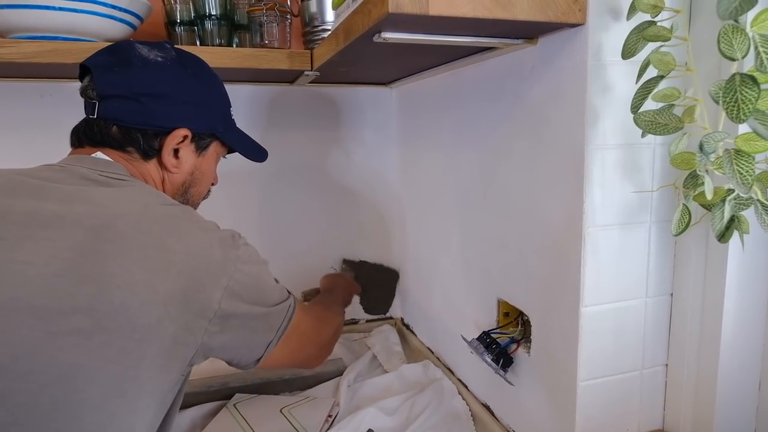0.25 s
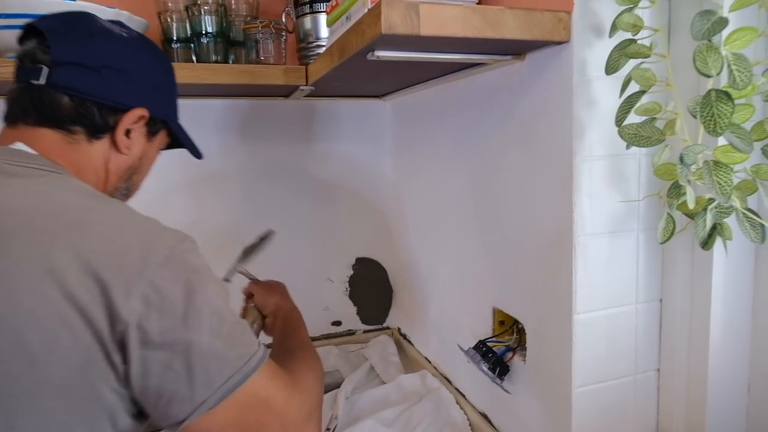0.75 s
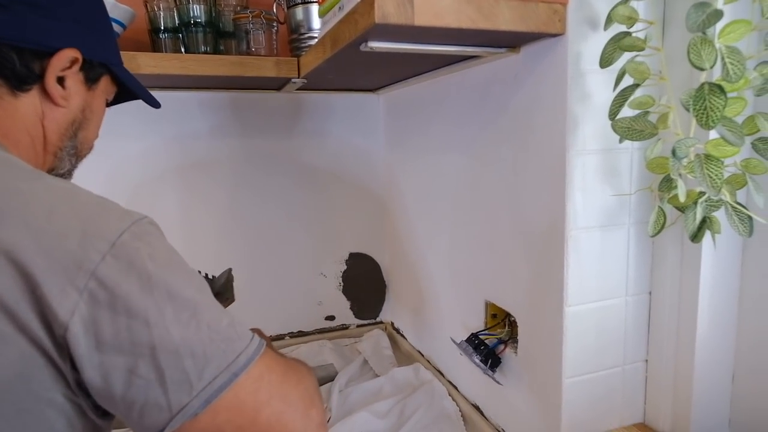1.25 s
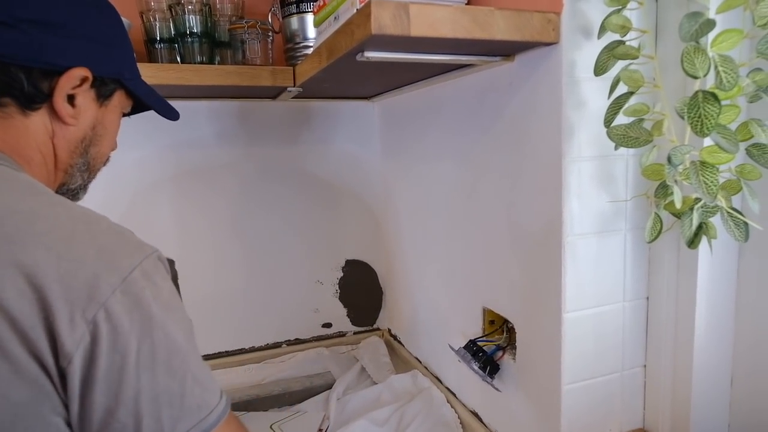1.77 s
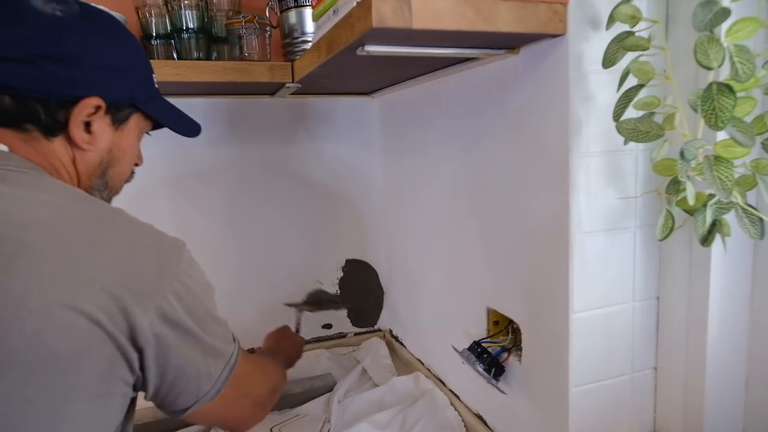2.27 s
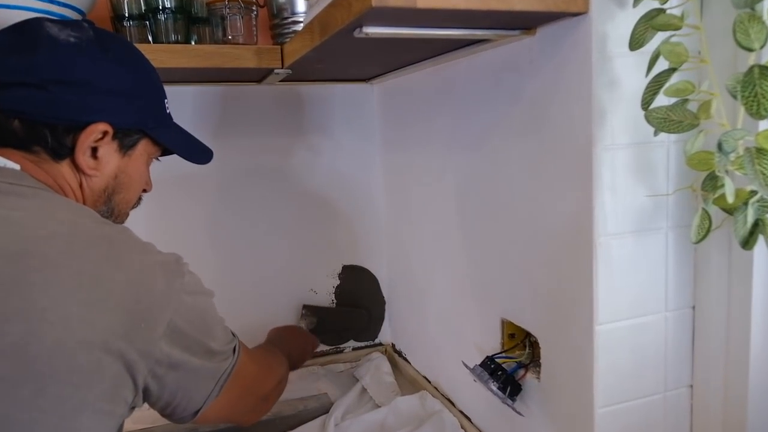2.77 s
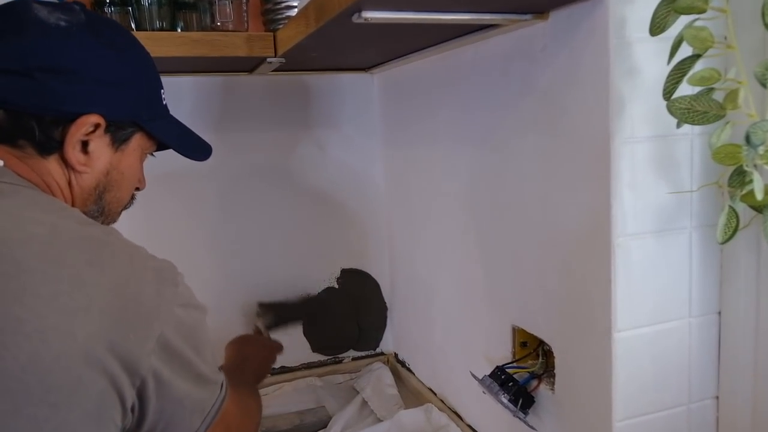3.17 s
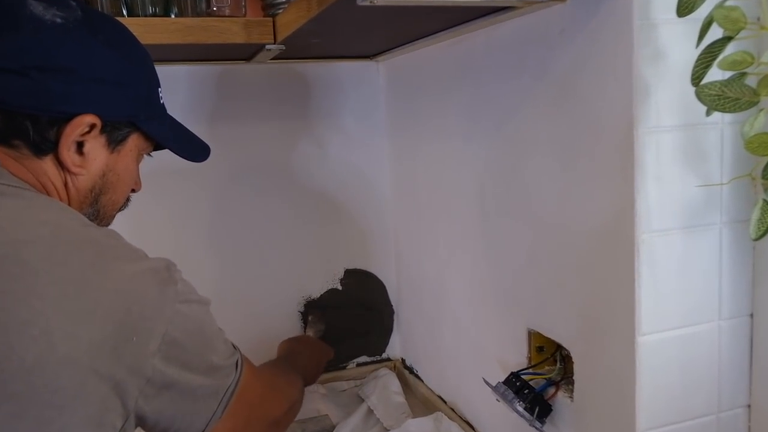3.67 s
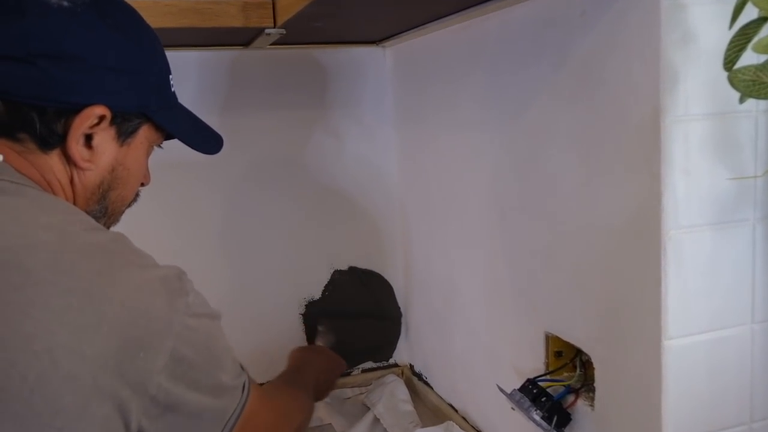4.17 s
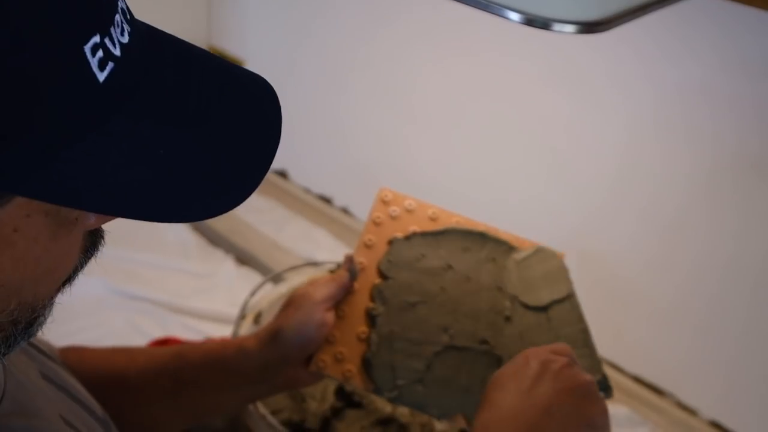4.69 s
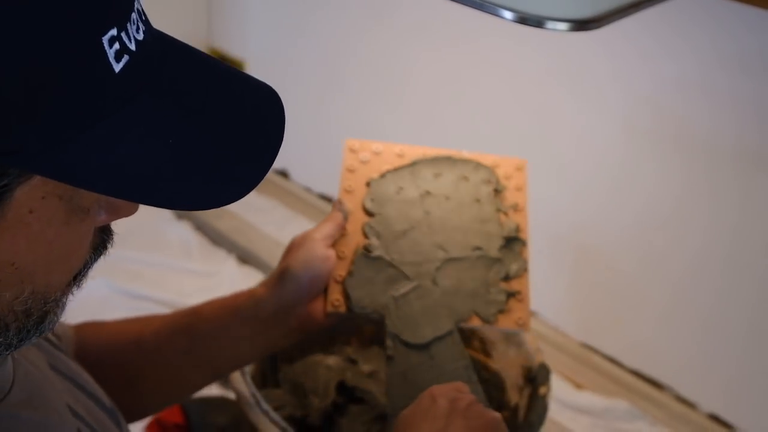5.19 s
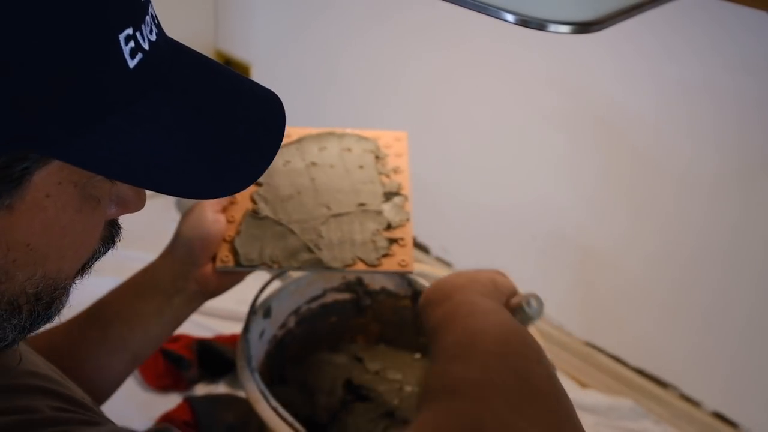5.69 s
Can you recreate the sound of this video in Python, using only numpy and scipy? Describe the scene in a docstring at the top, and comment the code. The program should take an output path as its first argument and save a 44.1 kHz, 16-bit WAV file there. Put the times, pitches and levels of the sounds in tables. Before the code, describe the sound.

A small steel trowel works sandy wet adhesive in a bare kitchen. A gritty wipe on the wall comes first, then a wet slap and a longer rising scoop from a bucket. After a quiet gap come brief hollow spreading scrapes and soft pats, then rapid rasps on the back of a tile and a last pair of scrapes. Close stereo microphones catch a short bright room echo over faint air.

```python
"""Trowel and gritty tile adhesive

A steel trowel spreads adhesive on a kitchen wall, scoops more from a bucket, then butters the back of a tile.
Strokes are random sand grains and paste hiss, bunched by stick and slip, coloured by contact resonances.
Unsteady sines make hollow honks, sinking sines make wall thuds; noise bursts make taps, smacks and ticks.
Swelling filtered noise is the smear of wet paste. A bare room answers a close pair of microphones,
over faint steady air."""
import sys
import numpy as np
from scipy import signal
from scipy.fft import rfft, irfft, next_fast_len
from scipy.io import wavfile
from scipy.ndimage import map_coordinates

SR = 44100
rng = np.random.default_rng(int(sys.argv[2]) if len(sys.argv) > 2 else 0)


def file_out(sig):
    """Save sig as 16-bit WAV at sys.argv[1]."""
    # one column per channel
    cols = np.atleast_2d(sig).T
    # limit, then scale
    lim = np.clip(cols, -1, 1)
    pcm = np.round(lim * 32767).astype(np.int16)
    wavfile.write(sys.argv[1], SR, pcm)


N = 261954
SIZE = 65536  # samples in one event
HZ, T = np.fft.rfftfreq(SIZE, 1 / SR), np.arange(SIZE) / SR


def amp(db):
    """Decibels to gain."""
    return 10 ** (np.asarray(db) / 20)


def unit(x):
    """Scaled to rms 1."""
    return x / np.sqrt(np.mean(x ** 2) + 1e-20)


def along(points, hz):
    """Interpolate (frequency [Hz], value) points on a log frequency axis."""
    f, v = np.transpose(points)
    return np.interp(np.log(hz + 1), np.log(f + 1), v)


def wobble(rate, size):
    """Smooth random curve, rate knots a second."""
    knots = rng.standard_normal(int(size * rate / SR) + 4)
    return map_coordinates(knots, [np.arange(size) * rate / SR])


def add(track, s, sound, fade_s=.3):
    """Mix a stereo sound into the track from time s, fading its far end."""
    at = round(s * SR)
    start = max(at, 0)
    faded = sound * np.minimum((T[-1] - T) / fade_s, 1)
    part = faded[:, max(-at, 0):N - at]
    track[:, start:start + part.shape[1]] += part


def body(tone, ring=()):
    """Causal minimum-phase response of unit power: a broad colour with resonant peaks on it."""
    db = along(tone, HZ)
    for hz, half_width_hz, lift_db in ring:
        db = db + lift_db / (1 + ((HZ - hz) / half_width_hz) ** 2)
    cepstrum = irfft(np.log(amp(db) + 1e-5))[:SIZE // 2]
    response = np.exp(rfft(2 * cepstrum, SIZE))
    return response / np.sqrt(np.mean(np.abs(response) ** 2))


# left-right likeness: (frequency [Hz], likeness [0-1])
ALIKE = [(60, .998), (340, .999), (520, .99), (750, .94), (1410, .68), (3100, .33), (6820, .05), (15000, 0)]
# left-right balance: (frequency [Hz], left minus right [dB])
LEAN_DB = [(600, 0), (1300, -1.2), (2400, -2.4), (4400, 0), (15000, 0)]


def ports(mid, side, hz):
    """Two close microphones: alike in the bass, unrelated in the treble."""
    turn = np.arccos(along(ALIKE, hz)) / 2
    sign = np.array([[1], [-1]])
    pair = mid * np.cos(turn) + sign * side * np.sin(turn)
    return pair * amp(sign * along(LEAN_DB, hz) / 2)


# decay of the bare room: (frequency [Hz], t60 [s])
ROOM_T60_S = [(150, 0.67), (400, 0.38), (1000, 0.57), (2500, 0.52), (5000, 0.47), (10000, 0.31),
              (16000, 0.21)]
# colour of the late sound: (frequency [Hz], level [dB])
WET_DB = [(150, 4.5), (400, -5.5), (1200, -5), (3000, -11), (6000, -8), (15000, -3)]


def room(pair, wet_db, near_db=-4.5, near_t60=0.058):
    """Direct sound, quick corner-wall cluster and long bare-room tail, from mid and side spectra."""
    def spectrum(x):
        """Spectrum of unit-energy echoes."""
        return rfft(x[:, :SIZE] / np.linalg.norm(x, axis=1, keepdims=True), SIZE)

    near_fade = amp(-60 * T / near_t60) * (1 - np.exp(-T / 0.0016))
    near = spectrum(rng.standard_normal((2, SIZE)) * near_fade)
    hz, t, z = signal.stft(rng.standard_normal((2, SR)), SR, nperseg=256)
    t60 = along(ROOM_T60_S, hz)[:, None]
    late_fade = amp(-60 * t / t60) * (1 - np.exp(-t / 0.0087)) / np.sqrt(t60)
    late = spectrum(signal.istft(z * late_fade, SR, nperseg=256)[1])
    echo = amp(near_db) * HZ / np.hypot(HZ, 1100)  # near echoes are weaker in the bass
    direct_and_near = (1 + echo * near) / np.sqrt(1 + echo ** 2)
    paths = direct_and_near + amp(wet_db + along(WET_DB, HZ)) * late
    return irfft(ports(*(pair * paths), HZ))


def burst(db, t60):
    """Mid and side spectra of a noise crunch that dies away exponentially."""
    return rfft(amp(db - 60 * T / t60) * rng.standard_normal((2, SIZE)))


def rush(tone):
    """Steady coloured stereo noise of rms 1."""
    size = next_fast_len(N + 8192)
    hz = np.fft.rfftfreq(size, 1 / SR)
    pair = ports(*rfft(rng.standard_normal((2, size))), hz)
    return unit(irfft(pair * amp(along(tone, hz)), size)[:, :N])


# relative colour of each contact: (frequency [Hz], level [dB])
WIPE_TONE_DB = [(40, -55), (100, -36.5), (200, -21.5), (350, -13), (600, -4), (1000, -2.5), (1600, 2),
                (2500, 5.5), (3600, -1.5), (5000, -7), (8000, -14.5), (12000, -19.5), (15000, -31)]
SLAP_TONE_DB = [(40, -83), (100, -17), (200, -33), (350, -20), (600, -2.5), (1000, 3.5), (1600, 0),
                (2500, -1.5), (3600, -5.5), (5000, -4.5), (8000, -14), (12000, -15), (15000, -21)]
SCOOP_TONE_DB = [(40, -60), (100, -28), (200, -16.5), (350, -6), (600, -3), (1000, -4.5), (1600, 6),
                 (2500, 1.5), (3600, -1.5), (5000, -7), (8000, -12), (12000, -17.5), (15000, -21.5)]
LIFT_TONE_DB = [(40, -55), (100, -26.5), (200, -22), (350, -14), (600, -7), (1000, -0.5), (1600, -1.5),
                (2500, 0), (3600, -1.5), (5000, -7), (8000, -11.5), (12000, -16.5), (15000, -23)]
SPREAD_TONE_DB = [(40, -57), (100, -37), (200, -18.5), (350, -7), (600, -7.5), (1000, -0.5), (1600, -5),
                  (2500, -6), (3600, -6.5), (5000, -14.5), (8000, -19.5), (12000, -21.5), (15000, -31)]
PRESS_TONE_DB = [(40, -47), (100, -25), (200, -36), (350, -1.5), (600, -4), (1000, 2), (1600, -3),
                 (2500, -2), (3600, -4.5), (5000, -9.5), (8000, -12), (12000, -16.5), (15000, -25)]
BUTTER_TONE_DB = [(40, -57), (100, -31), (200, -21.5), (350, -10.5), (600, -4), (1000, -4), (1600, -1.5),
                  (2500, 1), (3600, -2.5), (5000, -10.5), (8000, -13.5), (12000, -19.5), (15000, -29)]
CLEAN_TONE_DB = [(40, -53.5), (100, -37), (200, -28), (350, -16), (600, -12.5), (1000, -2), (1600, 1),
                 (2500, 1), (3600, -1.5), (5000, -7), (8000, -11.5), (12000, -20), (15000, -27)]
# resonances of blade and surface, before wander: (frequency [Hz], half-width [Hz], lift [dB])
WIPE_RING = [(562, 50, 7), (1352, 92, 11), (1910, 110, 6), (2550, 157, -0.5), (3130, 870, 4)]
SLAP_RING = [(393, 41, 9.1), (1270, 110, 3.5), (2400, 150, 8.3), (2800, 78, 11), (8400, 630, 9.1)]
SCOOP_RING = [(950, 80, 11), (1257, 60, 6.1), (1610, 55, 1.7), (2050, 96, 1.9)]
LIFT_RING = [(403, 11.3, 20.7), (1280, 140, 5.6), (1660, 33, 8.4), (1744, 82, 7.9)]
SPREAD_RING = [(598, 48, 7.3), (778, 15, 6.1), (1710, 54, 7.3), (1980, 35, 5.9), (2370, 110, 6.6),
               (3220, 80, 5.1)]
PRESS_RING = [(572, 67, 10.5), (870, 37, 1), (1800, 60, 5.6), (3070, 130, 3.6), (3640, 33, 2.2)]
BUTTER_RING = [(706, 35, 6.2), (1024, 54, 10.4), (1430, 17, 3.5), (1650, 120, 4.8), (2330, 160, 6.6)]
CLEAN_RING = [(403, 41, 8.4), (731, 28, 9.5), (1110, 38, 3.1), (1866, 110, 7), (3220, 300, 2.9),
              (5400, 80, 4.2)]
# pulls of the blade: (time [s], length [s], level [dB], swell over the pull [dB],
# bite on landing, negative eases in [dB], roll from edge to flat [dB], contact [name])
PULLS = [(-.09, 0.039, -29.5, -11, -4, 18, "wipe"), (.4665, 0.11, -21.5, 5.5, -3.5, 16, "wipe"),
         (1.1937, 0.041, -24.5, -4.5, 18, 7.5, "slap"), (1.279, .275, -25.5, 11, 2.5, 0.5, "scoop"),
         (1.565, 0.2, -21.5, 0.5, 1.5, 3.5, "lift"), (3.0471, .076, -26.5, -11, 4.5, 3, "spread"),
         (3.8792, .075, -24.5, -14, 4, 4.5, "press"), (4.603, 0.043, -23.5, 0, 0.5, 8.5, "butter"),
         (4.661, 0.034, -22, -6, 4.5, 3, "butter"), (4.721, 0.035, -22.5, -2.5, -5, 9, "butter"),
         (4.7722, .007, -21.5, -10, 3, -1, "butter"), (5.168, 0.024, -20.5, -10, -5.5, 6, "clean"),
         (5.201, .102, -23, 0, 5.5, 6.5, "clean")]


def strokes():
    """Wall, bucket, wall again, then tile back: each contact has its own colour and place in the room."""
    contacts = {
        "wipe": dict(tone=WIPE_TONE_DB, ring=WIPE_RING, wet_db=2, glide_oct=-0.026, pan_db=0,
                     edge_db=2.5, low_hz=1050, high_hz=2960),
        "slap": dict(tone=SLAP_TONE_DB, ring=SLAP_RING, wet_db=1, glide_oct=0, pan_db=.5),
        "scoop": dict(tone=SCOOP_TONE_DB, ring=SCOOP_RING, wet_db=0.5, glide_oct=.22, pan_db=0.7),
        "lift": dict(tone=LIFT_TONE_DB, ring=LIFT_RING, wet_db=2.0, glide_oct=0.0416, pan_db=0.5),
        "spread": dict(tone=SPREAD_TONE_DB, ring=SPREAD_RING, wet_db=0, glide_oct=0.027, pan_db=0.5,
                       edge_db=1.5),
        "press": dict(tone=PRESS_TONE_DB, ring=PRESS_RING, wet_db=1.0, glide_oct=0.015, pan_db=.5,
                      edge_db=0.0),
        "butter": dict(tone=BUTTER_TONE_DB, ring=BUTTER_RING, wet_db=0.5, glide_oct=0.0206, pan_db=-.5,
                       edge_db=-0.5),
        "clean": dict(tone=CLEAN_TONE_DB, ring=CLEAN_RING, wet_db=-0.5, glide_oct=0.032, pan_db=-.5,
                      edge_db=2)}
    out = np.zeros((2, N))
    for s, length, level_db, swell_db, bite_db, roll_db, contact in PULLS:
        force = drag(s, length, level_db, swell_db, bite_db)
        add(out, s - GRAZE_S, stroke(force, length, roll_db, **contacts[contact]))
    return out


def stroke(force, length, roll_db, tone, ring, wet_db, glide_oct, pan_db, wander_oct=0.0151,
           low_hz=900, high_hz=4000, edge_db=1, bass_hz=70):
    """One pull: rolling from edge to flat trades treble hiss for low resonances."""
    progress = np.minimum(T / length, 1) - .5
    edge = amp(edge_db - roll_db * progress)
    grains = sand(grains_per_s=2200, spread_db=3, paste_db=-9, judder_db=2.0, judder_rate=330)
    grit = irfft(rfft(grains) * body(tone, ring))
    # the contact line moves along the blade, so the resonances wander and glide
    place = np.cumsum(2 ** (glide_oct * progress + wander_oct * wobble(35.06, SIZE)))
    grit = rfft([map_coordinates(g, [place], mode="wrap") for g in grit])
    low = 1 / (1 + (HZ / low_hz) ** 4)
    high = 1 - 1 / (1 + (HZ / high_hz) ** 4)
    scrape = irfft(grit * low) / edge + irfft(grit * (1 - low - high)) + irfft(grit * high) * edge
    radiated = (1j * HZ / (1j * HZ + bass_hz)) ** 2  # a small blade gives off little deep bass
    heard = room(rfft(scrape * force) * radiated, wet_db)
    shade_db = np.outer([1, -1], 1 - low) * pan_db / 2  # only short waves are shaded to one side
    return irfft(rfft(heard) * amp(shade_db))


def sand(grains_per_s, spread_db, paste_db, judder_db, judder_rate):
    """Unequal sand grains crack along the blade over paste hiss, bunched by stick and slip."""
    chance = rng.random((2, SIZE))
    size, sign, hiss = rng.standard_normal((3, 2, SIZE))
    grains = (chance < grains_per_s / SR) * amp(spread_db * np.clip(size, -2, 2)) * np.sign(sign)
    judder = amp(judder_db * wobble(judder_rate, SIZE))
    return unit((unit(grains) + amp(paste_db) * hiss) * judder)


# catches and brief slips on coarse sand: (time [s], level change, negative eases [dB])
CATCHES = [(.537, 9), (1.297, 4), (1.3405, 6), (1.417, 0.5), (1.654, 2), (3.087, 5.5), (3.885, 4),
           (4.644, 3.5), (5.256, -3.5), (5.279, 6), (5.296, 5)]
CATCH_S = 0.0031  # Gaussian half length
ATTACK_S, RELEASE_S, BITE_S = 0.0027, 0.0077, 0.0037  # landing ramp; decay constants of release and bite
GRAZE_S, GRAZE_DB = .009, -12  # graze before landing; level when there is no bite
ARCH_DB = 2.5  # the hand presses hardest in mid-pull
UNEVEN_DB, UNEVEN_PER_S = 1.53, 74.5  # lumps in the paste vary the drag


def drag(s, length, level_db, swell_db, bite_db):
    """Force of one pull: graze, landing bite, swell along an arch, catches and slips on sand, release."""
    t = np.maximum(T - GRAZE_S, 0)
    progress = np.minimum(t / length, 1)
    arch_db = swell_db * (progress - .5) + ARCH_DB * (np.sin(np.pi * progress) - 2 / np.pi)
    catch_db = sum(db * np.exp(-((s + t - at) / CATCH_S) ** 2)
                   for at, db in CATCHES if s < at < s + length)
    landed = np.minimum(t / ATTACK_S, 1) ** 2
    # a harder landing has a fainter graze
    graze = amp(GRAZE_DB - 2 * max(bite_db, 0)) * np.minimum(T / GRAZE_S, 1) ** 2
    bite = amp(bite_db * np.exp(-t / BITE_S))
    release = np.exp(-np.maximum(t - length, 0) / RELEASE_S)
    contact = (graze * (1 - landed) + landed * bite) * release
    uneven_db = UNEVEN_DB * wobble(UNEVEN_PER_S, SIZE)
    return contact * amp(level_db + arch_db + catch_db + uneven_db)


# flat-blade chatter: (time [s], length [s], centre frequency [Hz], level [dB])
HONKS = [(3.049, 0.031, 577, -28), (3.1, 0.053, 627.6, -26.5), (3.101, 0.036, 752, -22.5),
         (3.877, 0.024, 1697, -21.5), (3.877, 0.067, 561, -23.5), (4.604, 0.05, 1580, -22),
         (5.293, 0.062, 360, -35.5)]


def chatter():
    """Stick and slip locks onto one blade mode for a moment: a short, hollow honk."""
    out = np.zeros((2, N))
    for s, length, hz, db in HONKS:
        swell = np.sin(np.pi * np.clip(T / length, 0, 1) ** 0.49)
        phase = 2 * np.pi * np.cumsum(hz * (1 + 0.027 * wobble(115, SIZE))) / SR
        pair = amp(db) * swell * np.array([np.sin(phase), np.cos(phase)])
        add(out, s, room(rfft(pair), wet_db=-5.0))
    return out


# light blade touches: (time [s], level [dB], t60 [s])
TAPS = [(0.422, -51, 0.032), (2.817, -44.5, 0.12), (2.827, -49, 0.13), (2.875, -37, 0.047),
        (2.882, -35.5, 0.022), (5.039, -43.5, 0.049), (5.046, -25.5, 0.04)]
# relative colour of the steel: (frequency [Hz], level [dB])
TAP_TONE_DB = [(120, -16), (330, -7), (550, -16.5), (780, -2.5), (1500, -14.5), (2500, -5.5), (3600, -6.5),
               (5000, -14), (9000, -29.5), (16000, -43)]


def taps():
    """Light blade touches: decaying noise bursts coloured by the steel."""
    out, steel = np.zeros((2, N)), body(TAP_TONE_DB)
    for s, db, t60 in TAPS:
        add(out, s, room(burst(db, t60) * steel, wet_db=1.0))
    return out


# flat blade on paste: (time [s], thud [dB], smack [dB], smack t60 [s])
PATS = [(0.325, -53, -65, 0.058), (0.334, -46, -73, .03), (.661, -39, -59, .03), (1.195, -31, -22, 0.033),
        (3.3916, -47, -27.5, 0.055), (3.428, -45.5, -42, .04), (3.613, -52, -50, 0.056),
        (3.955, -38.5, -41.5, .04), (4.351, -33, -34, 0.023), (4.376, -41, -45.5, 0.072)]
# wall modes: (settled frequency [Hz], relative level [dB], t60 [s])
THUD_MODES = [(146, -10, 0.073), (241, -6.5, 0.11), (298.6, -8.5, 0.33), (341, 1.5, 0.054),
              (435, -4, 0.027), (627, -21, .03)]
# relative colour of the wet smack: (frequency [Hz], level [dB])
SMACK_TONE_DB = [(150, -23), (350, 3), (550, -4.5), (850, -14.5), (1400, -11), (2100, -11), (2900, -16),
                 (4500, -23), (16000, -42.5)]


def pats():
    """Decaying wall modes thud and sink in pitch as the paste yields; a noise burst is the wet smack."""
    out, wet = np.zeros((2, N)), body(SMACK_TONE_DB)
    radiated = 1j * HZ / (1j * HZ + 110)  # a small patch of wall gives off little deep bass
    clock = np.cumsum(1 + 0.323 * np.exp(-T / 0.017)) / SR
    onset = 1 - np.exp(-T / 0.00036)
    for s, thud_db, smack_db, smack_t60 in PATS:
        thud = sum(amp(thud_db + db - 60 * T / t60) * np.sin(2 * np.pi * hz * clock)
                   for hz, db, t60 in THUD_MODES)
        smack = burst(smack_db, smack_t60) * wet
        add(out, s, room(rfft(thud * onset) * radiated + smack, wet_db=-1.5))
    return out


# faint dry ticks: (time [s], level [dB])
TICKS = [(1.158, -38.5), (2.234, -41), (2.254, -41.5), (2.444, -43), (2.644, -41.5), (2.925, -44.5),
         (4.265, -41), (4.505, -45.5)]
# relative tick colour: (frequency [Hz], level [dB])
TICK_TONE_DB = [(150, -51), (500, 8.5), (900, 2), (1600, -11), (2300, -10), (3500, -46), (16000, -57)]
# tiny bright click: (time [s], level [dB])
SNICKS = [(.7463, -30.5)]
# relative click colour: (frequency [Hz], level [dB])
SNICK_TONE_DB = [(500, -40), (4800, -30), (6300, -2), (8000, -19.5), (9300, -9), (11000, -20), (16000, -32)]


def ticks(rows, tone, t60):
    """Tiny close noise clicks, too weak to stir the room."""
    out, colour = np.zeros((2, N)), body(tone)
    for s, db in rows:
        add(out, s, irfft(ports(*burst(db, t60), HZ) * colour))
    return out


# light glides over wet paste: (time [s], length [s], peak hiss [dB], peak low rub [dB])
GLIDES = [(.17, 0.4, -53.5, -56), (0.652, 0.29, -53, -64), (.98, .18, -59.5, -68),
          (2.604, 0.26, -61.5, -75.5), (2.78, 0.19, -64, -51.5), (2.925, 0.27, -54.5, -61),
          (3.596, 0.65, -56, -55.5), (4.364, 0.24, -64, -58), (5.035, 0.48, -47.5, -61),
          (5.76, 0.2, -61, -83)]
# relative colour of paste hiss: (frequency [Hz], level [dB])
HISS_TONE_DB = [(410, -29), (700, -2), (984, -7.5), (1280, -2), (1560, -12), (1800, -4.5), (3790, -7),
                (14600, -20.5), (16000, -36.5)]
# relative colour of the wall's hum: (frequency [Hz], level [dB])
RUB_TONE_DB = [(150, -20), (280, -12.5), (340, -6), (410, -22), (650, -15), (1200, -44), (3000, -67.5)]


def smear():
    """Wet paste hisses under the gliding blade and the wall hums to the rubbing, as swelling noise."""
    t, hiss, rub = np.arange(N) / SR, np.zeros(N), np.zeros(N)
    for s, length, hiss_db, rub_db in GLIDES:
        speed = np.sin(np.pi * np.clip((t - s) / length, 0, 1))
        hiss += amp(hiss_db) * speed
        rub += amp(rub_db) * speed
    flutter = amp(0.56 * wobble(97, N))
    return hiss * flutter * rush(HISS_TONE_DB) + rub * rush(RUB_TONE_DB)


# relative colour of still room air: (frequency [Hz], level [dB])
AIR_TONE_DB = [(12, -41), (24, 3.5), (38, -7), (68, -6), (91, -1), (134, -12), (228, -7.5), (301, -3),
               (367, -11.5), (446, -10), (780, -8.5), (873, -12.5), (2530, -18.5), (4180, -22.5),
               (16000, -33.5)]
AIR_DB = -57.5


def air():
    """Faint air of the room: steady coloured noise."""
    return amp(AIR_DB) * rush(AIR_TONE_DB)


def scene():
    """All the work over the room air."""
    clicks = ticks(TICKS, TICK_TONE_DB, t60=0.016) + ticks(SNICKS, SNICK_TONE_DB, t60=0.006)
    return strokes() + chatter() + taps() + pats() + clicks + smear() + air()


TOP_HZ = 16100


def record(dry):
    """Band limit: nothing passes from TOP_HZ up."""
    size = next_fast_len(N + 8192)
    passed = np.fft.rfftfreq(size, 1 / SR) < TOP_HZ
    return irfft(rfft(dry, size) * passed, size)[:, :N]


dry = scene()
out = record(dry)
file_out(out)
```